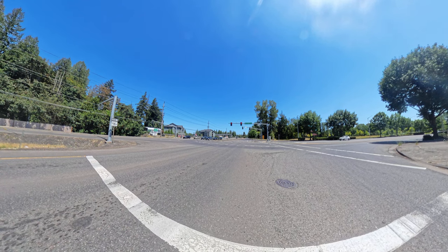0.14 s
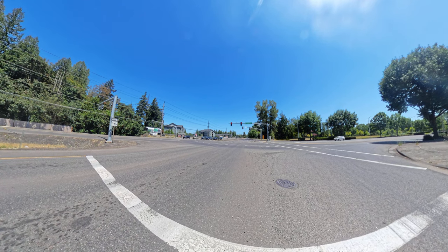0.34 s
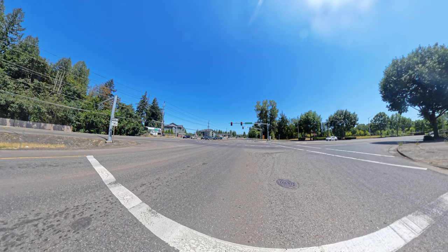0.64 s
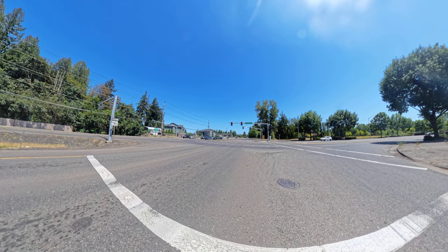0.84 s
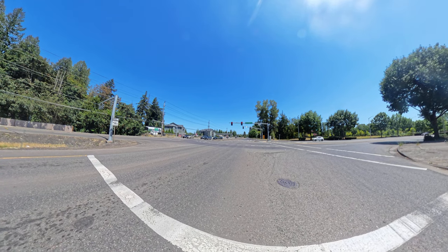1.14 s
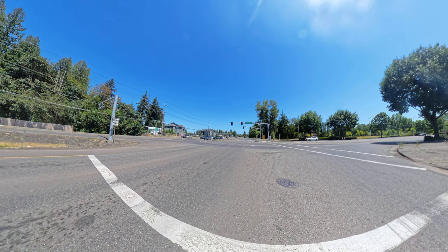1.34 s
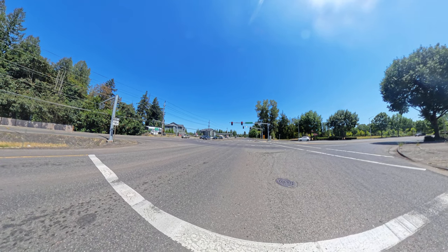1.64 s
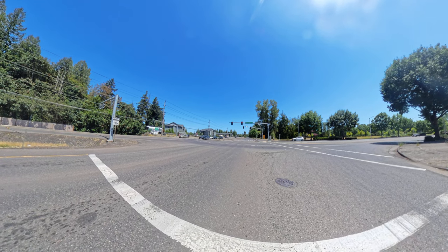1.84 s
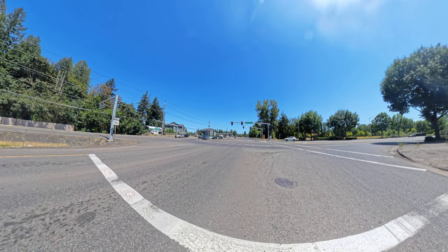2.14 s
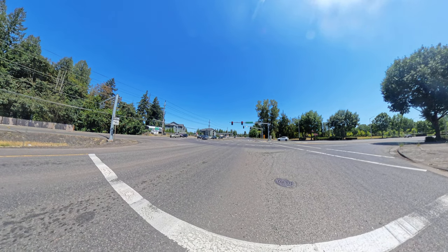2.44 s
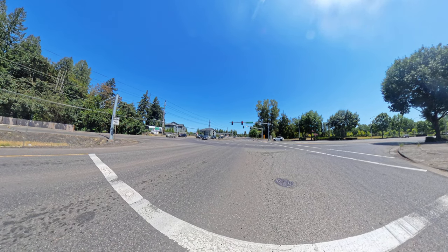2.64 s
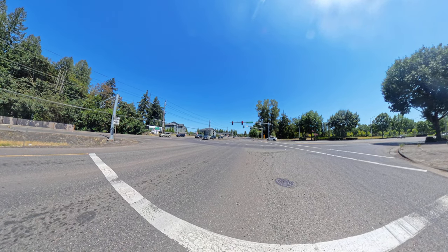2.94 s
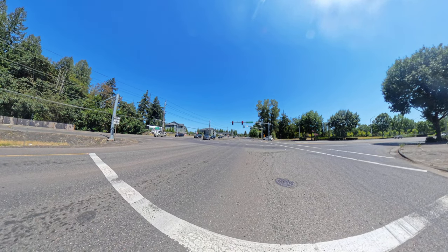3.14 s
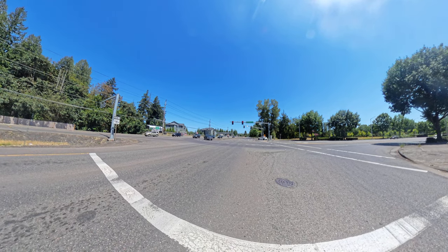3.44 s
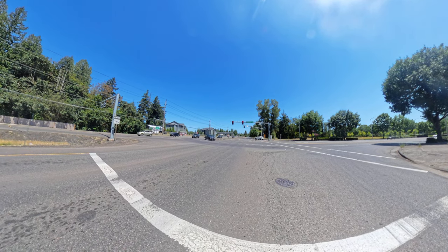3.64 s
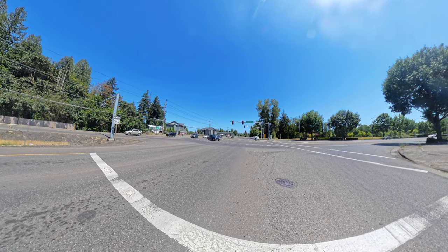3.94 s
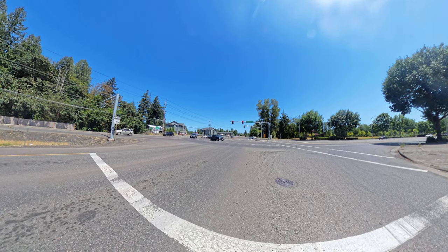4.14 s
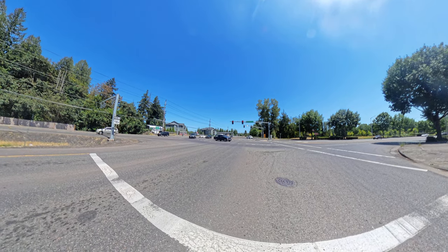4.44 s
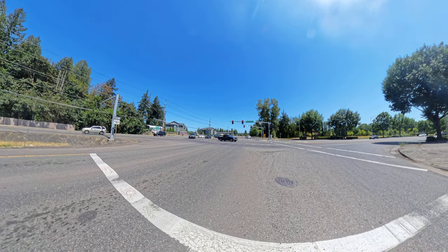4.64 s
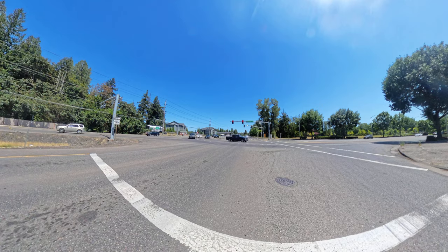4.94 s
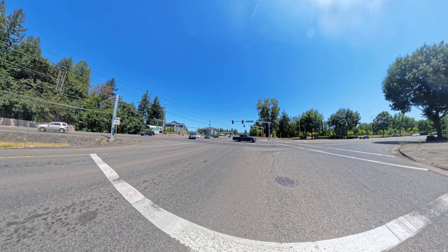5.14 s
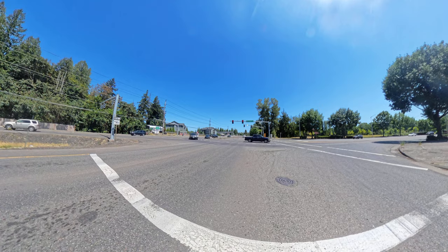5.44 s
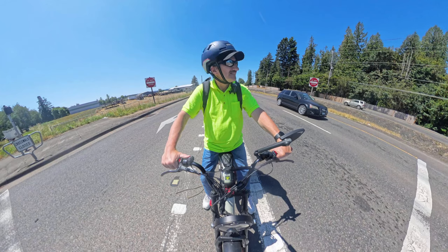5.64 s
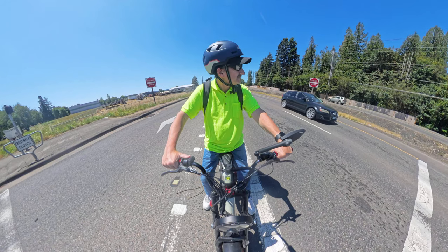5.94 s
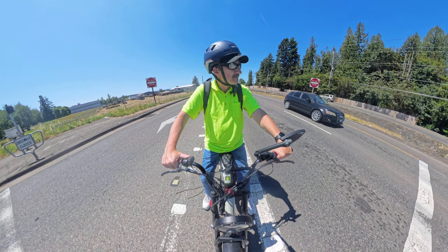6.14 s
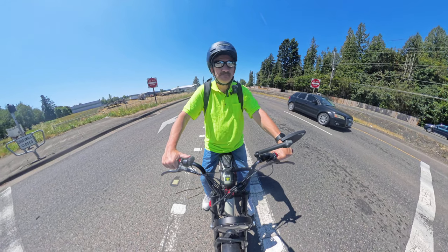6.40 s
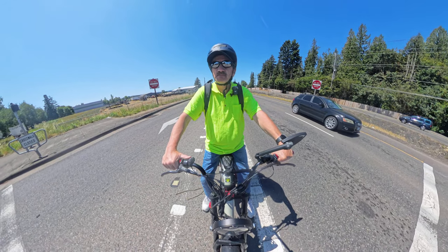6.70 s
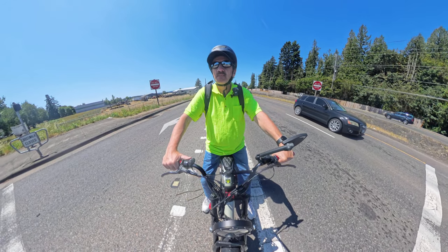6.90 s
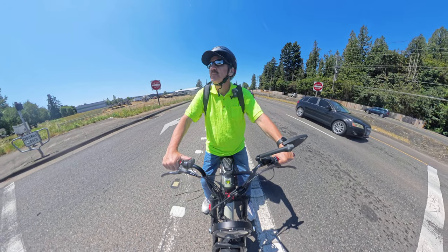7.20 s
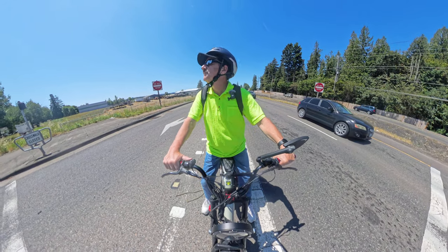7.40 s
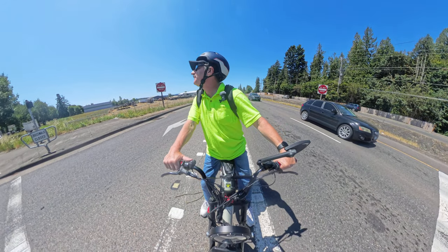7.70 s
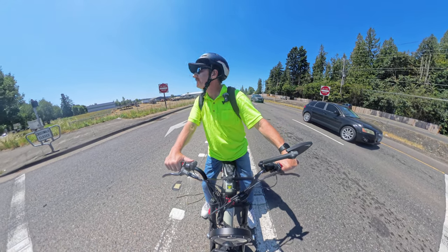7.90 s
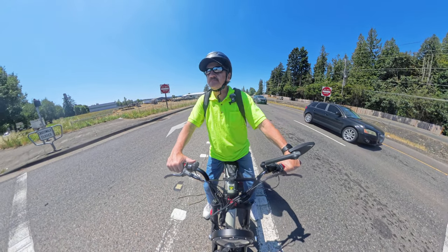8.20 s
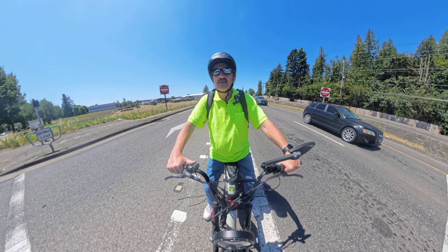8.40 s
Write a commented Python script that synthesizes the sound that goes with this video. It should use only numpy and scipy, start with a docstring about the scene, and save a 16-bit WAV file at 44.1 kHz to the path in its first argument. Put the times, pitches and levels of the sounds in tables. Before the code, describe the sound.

Traffic at a wide road junction swells steadily, tyre roar growing nearer and brighter while one car pulls away and another slows to an idle.

```python
"""Traffic at a wide road junction, heard from a bicycle waiting in a lane: tyre noise is filtered noise
in four bands, brighter as the traffic nears; engines are sines at the firing rate and its multiples.
One car pulls away on a rising note, another slows and idles alongside; a drone and short engine tones join.
Soft noise swells in single bands, far traffic murmurs and light air rumbles at the microphone.
Short noise bursts make a scratchy chirp and two wheel thuds; decaying sines make a few faint ticks."""
import sys
import numpy as np
from scipy import signal
from scipy.fft import rfft, irfft, next_fast_len
from scipy.io import wavfile

SR = 44100
rng = np.random.default_rng(int(sys.argv[2]) if len(sys.argv) > 2 else 0)


def unload_audio(sound):
    """Save the sound as a 16-bit wav file, at the path given as the first command line argument."""
    columns = np.transpose(np.atleast_2d(sound))
    # keep every value between -1 and 1, then stretch to whole-number steps
    steps = np.round(np.clip(columns, -1, 1) * 32767)
    wavfile.write(sys.argv[1], SR, steps.astype(np.int16))


N = 377496
TIME = np.arange(N) / SR


def gain_of(db):
    """Decibels to amplitude."""
    return 10 ** (np.asarray(db) / 20)


def evened(x):
    """Scales to an rms of one."""
    return x / np.sqrt(np.mean(x ** 2) + 1e-20)


def follow(rows):
    """The columns of a curve table, interpolated at every sample."""
    s, *columns = np.transpose(rows)
    return [np.interp(TIME, s, c) for c in columns]


def shaped(gain_at):
    """Noise of unit rms whose spectrum is the given function of frequency."""
    size = next_fast_len(N)
    hz = np.arange(size // 2 + 1) * SR / size
    spectrum = rfft(rng.standard_normal(size)) * gain_at(hz)
    return evened(irfft(spectrum, size)[:N])


def noise(colour):
    """Unit-rms noise, its spectrum drawn through (Hz, dB) points on a log frequency axis."""
    point_hz, point_db = np.transpose(colour)
    return shaped(lambda hz: gain_of(np.interp(np.log(hz + 1), np.log(point_hz + 1), point_db)))


def wander(rate_hz):
    """Smooth random curve of unit rms, mostly slower than the given rate."""
    return shaped(lambda hz: 1 / (1 + (hz / rate_hz) ** 4))


def swell(s, half_length_s):
    """Smooth Gaussian rise and fall around one moment."""
    return np.exp(-((TIME - s) / half_length_s) ** 2)


def firing(hz):
    """Phase of an engine's slightly unsteady firing cycle, and a fluttering gain."""
    hz = hz * (1 + 0.0025 * wander(5))
    flutter = gain_of(0.7 * wander(5))
    return 2 * np.pi * np.cumsum(hz) / SR, flutter


def earshot(rows, fade_s=0.12):
    """Gain that fades an engine in just before its curve begins."""
    return np.clip((TIME - rows[0][0]) / fade_s + 1, 0, 1)


def muffled_engine(hz, level, octave_db):
    """A well silenced exhaust: the firing tone and a weak octave."""
    phase, flutter = firing(hz)
    tones = np.sin(phase) + gain_of(octave_db) * np.sin(2 * phase)
    return np.sqrt(2) * level * flutter * tones


def lingering_engine(rows, trim_db, octave_db):
    """A quiet engine that follows its curves of firing rate and level."""
    hz, db = follow(rows)
    return muffled_engine(hz, earshot(rows) * gain_of(db + trim_db), octave_db)


def bursts(rows):
    """Noise bursts, each in one resonance with a linear rise and an exponential decay."""
    out = np.zeros(N)
    for s, db, centre_hz, octaves, rise_s, decay_s in rows:
        age = np.maximum(TIME - s, 0)
        envelope = np.minimum(age / rise_s, 1) * np.exp(-np.maximum(age - rise_s, 0) / decay_s)
        ring = shaped(lambda hz: np.exp(-(np.log2((hz + 1) / centre_hz) / octaves) ** 2))
        out += gain_of(db) * envelope * ring
    return out


def tyres():
    """Bodies rumble, tread blocks roar near 800 Hz, air squeezed from grooves hisses; nearer is brighter."""
    # the traffic draws nearer: (time [s], nearness [dB])
    nearness = [(0, -11), (1.4, -10), (2.4, -8), (3.3, -6), (4.5, -4.5), (5.4, -3), (6.1, -2), (7.2, -1.5),
                (8.56, -0.5)]
    # spectra before levelling: (frequency [Hz], relative density [dB per Hz])
    body_colour = [(20, -5), (60, 1), (110, -2.5), (180, -1.5), (260, 0.5), (380, -2.5), (520, -6.5),
                   (750, -16.5), (1400, -49), (3000, -66.5)]
    tread_colour = [(200, -25.5), (420, -8), (560, -2), (700, 0), (850, -0.5), (1020, -0.5), (1250, -6),
                    (1550, -14.5), (2000, -22), (3000, -49.5), (6000, -71.5)]
    pumping_colour = [(700, -21), (1400, 0.5), (1900, -2), (2500, -4), (3200, -7.5), (4000, -16.5),
                      (5200, -33), (8000, -49)]
    hiss_colour = [(1800, -22.5), (3000, 0.5), (3900, 2.5), (4700, 1), (5800, -2), (6500, -13.5),
                   (7100, -17.5), (9000, -21.5)]
    # level [dB] at 0 dB nearness, growth [dB per dB of nearness]
    body_db, body_growth = -35, 0.93
    tread_db, tread_growth = -35.5, 0.62
    pumping_db, pumping_growth = -51, 1.29
    hiss_db, hiss_growth = -61.5, 1.72
    brake_s, brake_db_per_s = 6.53, 6

    near_db = follow(nearness)[0]
    # the fine hiss dies away as the nearest car brakes
    braking_db = brake_db_per_s * np.maximum(TIME - brake_s, 0)
    body = gain_of(body_db + body_growth * near_db + 0.45 * wander(3.2)) * noise(body_colour)
    patches_db = 0.6 * wander(14)
    tread = gain_of(tread_db + tread_growth * near_db + patches_db) * noise(tread_colour)
    grit = wander(45)  # coarse asphalt shakes both upper layers together
    pumping = gain_of(pumping_db + pumping_growth * near_db + 0.81 * grit) * noise(pumping_colour)
    hiss_level_db = hiss_db + hiss_growth * near_db - braking_db
    hiss = gain_of(hiss_level_db + 0.76 * grit + 0.92 * wander(6.0)) * noise(hiss_colour)
    return body + tread + pumping + hiss


def far_traffic(level_db=-40.5):
    """Steady low murmur of distant road noise."""
    # spectrum before levelling: (frequency [Hz], relative density [dB per Hz])
    far_colour = [(15, -6), (33, 9), (60, -1), (85, 4), (105, -4.5), (145, -2), (200, -9), (300, -16),
                  (800, -73)]
    return gain_of(level_db) * noise(far_colour)


def breeze(draught_db=-40.5, gust_half_length_s=0.14):
    """Lumpy low eddies at the microphone: a steady draught, stronger in each gust."""
    # gusts: (time [s], level [dB])
    gusts = [(0.88, -35), (1.75, -43), (2.55, -33), (4.049, -47), (5.8, -43), (6.7, -46), (7.699, -37),
             (8.42, -37.5)]
    # spectrum before levelling: (frequency [Hz], relative density [dB per Hz])
    breeze_colour = [(1, -14), (5, 1), (15, 6), (30, -1.5), (55, -5.5), (100, -13), (200, -26),
                     (500, -78.5)]
    power = gain_of(draught_db) ** 2
    power += sum((gain_of(db) * swell(s, gust_half_length_s)) ** 2 for s, db in gusts)
    return np.sqrt(power) * gain_of(1.2 * wander(7.1)) * noise(breeze_colour)


def droning_engine():
    """A drone further off: firing tone and weak octave."""
    # (time [s], firing rate [Hz], tone level before trim [dB])
    drone_curve = [(0, 137.3, -37.5), (1.0, 135.5, -43.5), (2.4, 137.7, -44.5), (3.4, 139.6, -43.5),
                   (4.4, 141.5, -45), (6.1, 146, -53), (6.8, 135, -46.5), (8.56, 133.7, -63)]
    return lingering_engine(drone_curve, trim_db=-0.5, octave_db=-16.0)


def short_engine_tones():
    """Further engines and stray overtones, each swelling and fading with a steady or gliding pitch."""
    # (loudest time [s], half length [s], level [dB], pitch then [Hz], glide [Hz per s])
    tone_rows = [(0.0, 0.83, -41.5, 77.8, 6), (0.102, 0.5, -46.5, 50.2, 1.5),
                 (1.002, 0.99, -50.5, 121, 1.5), (3.094, 0.83, -42.5, 63, 4), (3.148, 0.25, -41, 85.6, 0),
                 (3.953, 0.35, -49.5, 156.8, 3), (3.976, 0.22, -38.5, 122.7, -21.5),
                 (4.404, 0.33, -45, 111.2, -8), (4.67, 0.22, -46, 300.4, 90), (5.15, 0.2, -51, 339, 31),
                 (6.1, 0.36, -45, 186, 30), (4.8, 0.9, -47, 67.1, 3), (5.0, 0.22, -46, 168.7, 9),
                 (8.146, 0.52, -49, 255.7, 4)]
    return sum(muffled_engine(hz + glide * (TIME - s), gain_of(db) * swell(s, half_s), octave_db=-16.5)
               for s, half_s, db, hz, glide in tone_rows)


def noise_swells():
    """Soft noise swells, each in one band that may slide up or down."""
    # (time [s], half length [s], level [dB], centre [Hz], width [octaves], glide [octaves per s])
    swell_rows = [(0.401, 0.55, -48.5, 964, 0.31, -0.23), (2.395, 0.27, -51.5, 1430, 0.31, -0.26),
                  (2.302, 0.36, -78, 4240, 0.2, 0.0), (2.601, 0.51, -47.5, 1130, 0.2, 0.0),
                  (3.201, 0.44, -69, 3710, 0.25, -0.12), (3.247, 0.7, -51, 1360, 0.28, -0.27),
                  (4.096, 0.36, -62.5, 2950, 0.33, -0.088), (4.281, 0.16, -73, 4402, 0.2, 0.11),
                  (4.698, 0.55, -46.5, 514, 0.3, 0.089), (5.043, 0.35, -60.5, 3050, 0.31, -0.14),
                  (5.622, 0.14, -65.5, 3500, 0.15, 0.25), (5.7, 0.17, -77, 5800, 0.19, 0.062),
                  (5.977, 0.31, -39, 826, 0.26, 0.28), (6.062, 0.31, -56, 2120, 0.36, -0.37),
                  (6.1, 0.86, -45, 186.5, 0.16, 0.21), (6.336, 0.12, -73, 5400, 0.22, -0.95),
                  (6.796, 0.5, -42, 840, 0.33, 0.14), (7.096, 0.28, -76, 5540, 0.37, -0.33),
                  (7.293, 0.39, -48, 1244, 0.33, 0.55), (7.725, 0.29, -56, 2360, 0.25, -0.67),
                  (8.0, 0.46, -44.5, 320, 0.72, 0.22), (8.248, 0.4, -42, 255, 0.22, -0.12),
                  (4.4, 0.28, -46, 360, 0.5, 0.0), (8.203, 0.6, -79.5, 6422, 0.12, -0.15),
                  (8.4, 0.26, -35, 792, 0.48, 0.19), (8.38, 0.13, -60.5, 3480, 0.34, 0.55),
                  (8.523, 0.16, -56.5, 2452, 0.18, 0.012)]
    hz, t, z = signal.stft(rng.standard_normal(N), SR, nperseg=1024)
    power = np.zeros(z.shape)
    for s, half_s, db, centre_hz, width, glide in swell_rows:
        octaves = np.log2((hz[:, None] + 1) / centre_hz) - glide * np.clip(t - s, -1, 1)
        band = np.exp(-(octaves / width) ** 2)
        band /= band.mean(0) + 1e-12
        power += gain_of(db) ** 2 * np.exp(-((t - s) / half_s) ** 2) * band
    return signal.istft(z * np.sqrt(power), SR, nperseg=1024)[1][:N]


def pulling_engine(tone_trim_db=0.5, octave_share=0.9, fading_db=1.2):
    """Load sharpens the exhaust pulses; overtones climb through pipe resonances and fade in and out."""
    # (time [s], firing rate [Hz], firing tone level before trim [dB])
    pull_curve = [(0.8, 61, -48), (1.7, 69.6, -38.5), (2.5, 74.77, -37.5), (2.95, 76.36, -39.5),
                  (3.45, 79.9, -39), (4.25, 81.57, -36.5), (5.1, 86.9, -37), (5.65, 90.1, -38.5),
                  (6.0, 91.5, -48), (6.5, 93.1, -39.5), (7.2, 96.05, -42.5), (7.6, 102.4, -43.5),
                  (7.9, 104.7, -37.5), (8.56, 102.7, -46.5)]
    # overtones, strong under load: (time [s], level before pipe and fading [dB])
    overtone_curve = [(0.8, -67), (2.3, -51), (3.25, -43), (4.05, -47.5), (4.6, -57), (5.6, -47),
                      (6.8, -52), (7.5, -57)]
    # exhaust pipe resonances: (frequency [Hz], gain [dB])
    exhaust = [(190, -2.5), (226, -2.5), (242, 0.5), (262, -2.5), (290, -7), (312, -5), (330, -11.5),
               (365, -8.5), (380, -12), (402, -8.5), (445, -7.5), (468, -5.5), (490, -12), (660, -15)]
    hz, tone_db = follow(pull_curve)
    overtones_db = follow(overtone_curve)[0]
    phase, flutter = firing(hz)
    # the octave lies between tone and overtones
    octave_db = tone_db + octave_share * (overtones_db - tone_db)
    hum = gain_of(tone_db + tone_trim_db) * np.sin(phase) + gain_of(octave_db) * np.sin(2 * phase)
    overtones = np.zeros(N)
    for k in range(3, 9):
        pipe_db = np.interp(k * hz, *np.transpose(exhaust))
        level = gain_of(pipe_db + fading_db * wander(3.1))
        overtones += level * np.sin(k * phase + 2 * np.pi * rng.random())
    return np.sqrt(2) * earshot(pull_curve) * flutter * (hum + gain_of(overtones_db) * overtones)


def slowing_engine():
    """A car slows to an idle: its firing rate falls, with a weak octave above the tone."""
    # (time [s], firing rate [Hz], tone level before trim [dB])
    slow_curve = [(0.8, 56, -53.5), (2.0, 45.77, -40.5), (2.7, 39.85, -37), (3.1, 39.6, -38),
                  (3.85, 37.84, -33.5), (4.5, 31.47, -42), (5.4, 30.38, -39.5), (6.3, 28.38, -37.5),
                  (7.3, 26.48, -40), (8.56, 28.7, -38.5)]
    return lingering_engine(slow_curve, trim_db=0.5, octave_db=-19.5)


def chirp():
    """A brief scratchy chirp of three quick noise bursts."""
    # (time [s], level [dB], centre [Hz], width [octaves], rise [s], decay [s])
    scratches = [(0.982, -65, 3400, 0.19, 0.005, 0.008), (0.997, -61, 2800, 0.3, 0.004, 0.005),
                 (1.0, -57, 3430, 0.22, 0.007, 0.008)]
    return bursts(scratches)


def thuds():
    """Wheels on uneven road: two dull, low noise bursts."""
    # (time [s], level [dB], centre [Hz], width [octaves], rise [s], decay [s])
    thud_rows = [(4.3, -40, 262, 0.19, 0.04, 0.056), (5.26, -35, 135, 0.52, 0.026, 0.039)]
    return bursts(thud_rows)


def ticks():
    """Small hard contacts: sines that decay in about a millisecond."""
    # (time [s], initial envelope level [dB], ring [Hz], decay [s])
    tick_rows = [(5.7287, -43, 5250, 0.0006), (7.6932, -45, 4900, 0.0005), (7.6945, -45, 3600, 0.0009),
                 (7.7025, -52, 5200, 0.0008), (7.7172, -46, 3650, 0.001)]
    out = np.zeros(N)
    for s, db, hz, decay_s in tick_rows:
        age = np.maximum(TIME - s, 0)
        out += gain_of(db) * np.exp(-age / decay_s) * np.sin(2 * np.pi * hz * age)
    return out


def scene():
    """Tyres, engines, far traffic, noise swells, air and small contacts, at one microphone."""
    road = tyres() + far_traffic() + noise_swells()
    engines = droning_engine() + short_engine_tones() + pulling_engine() + slowing_engine()
    contacts = chirp() + thuds() + ticks()
    return (road + breeze() + engines + contacts)[None]


def record(dry, edge_hz=7000):
    """The level dips briefly a few times; then a low-pass limits the band."""
    # (time [s], depth [dB], half length [s])
    dips = [(2.557, 13, 0.0045), (2.83, 7, 0.0077), (4.731, 4.5, 0.005), (5.278, 10.5, 0.0072),
            (5.554, 18, 0.0034), (6.656, 19, 0.004), (8.02, 12, 0.0037)]
    dip_db = sum(depth_db * swell(s, half_s) for s, depth_db, half_s in dips)
    low_pass = signal.firwin(301, edge_hz, window=("kaiser", 9), fs=SR)
    return signal.oaconvolve(dry * gain_of(-dip_db), low_pass[None], "same")


dry = scene()
out = record(dry)
unload_audio(out)
```